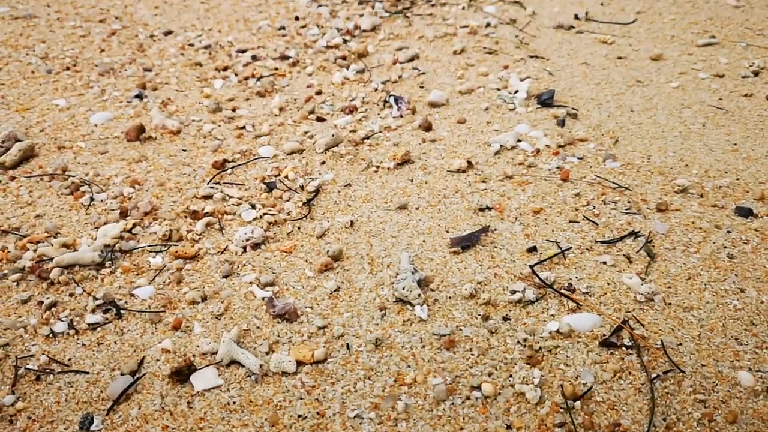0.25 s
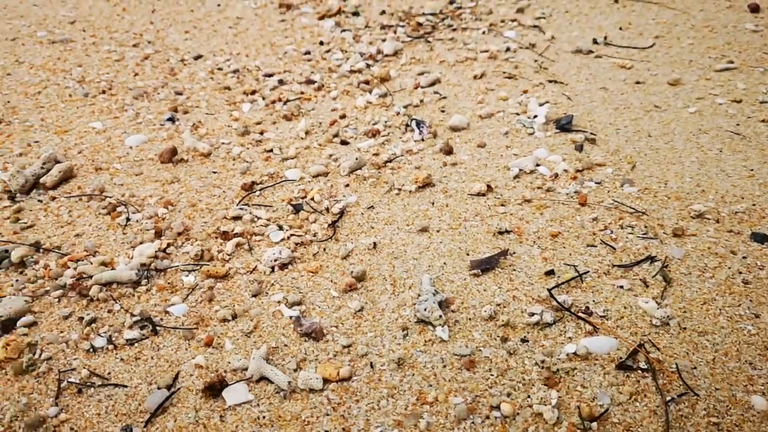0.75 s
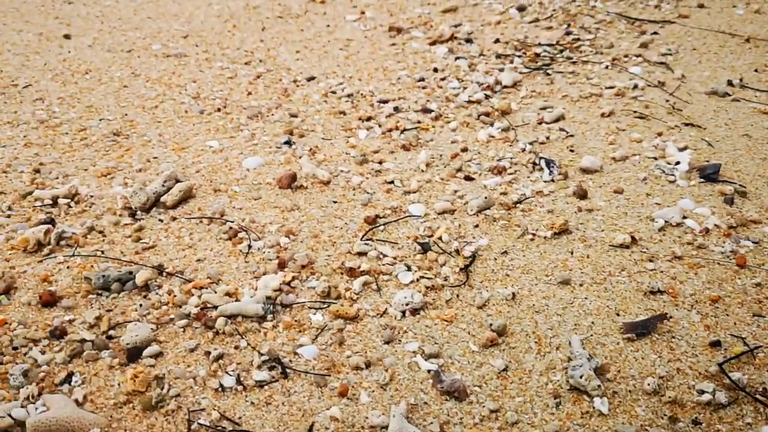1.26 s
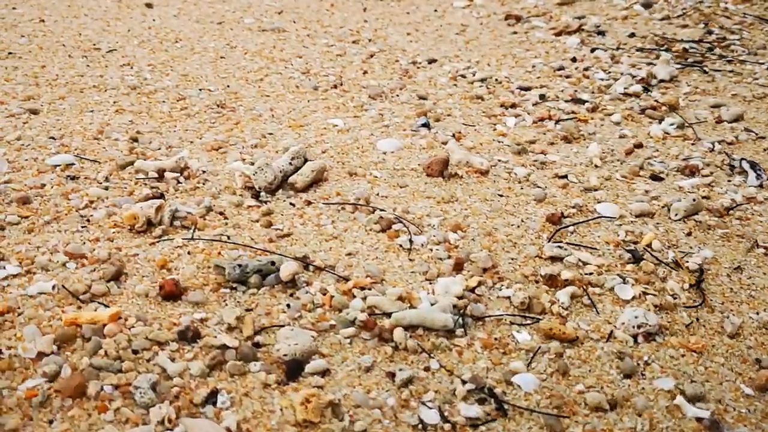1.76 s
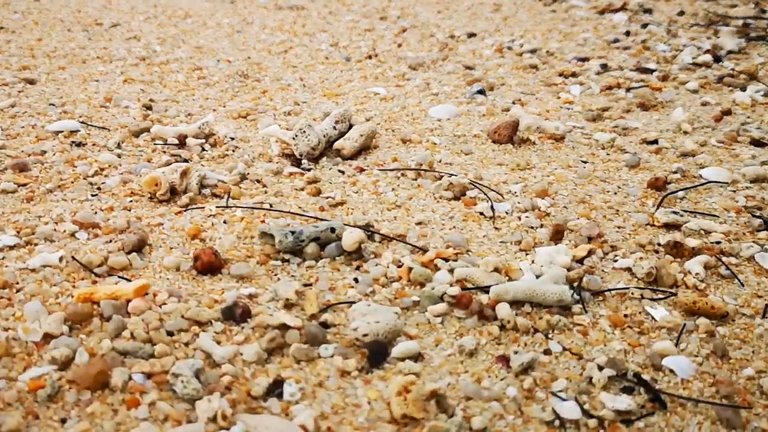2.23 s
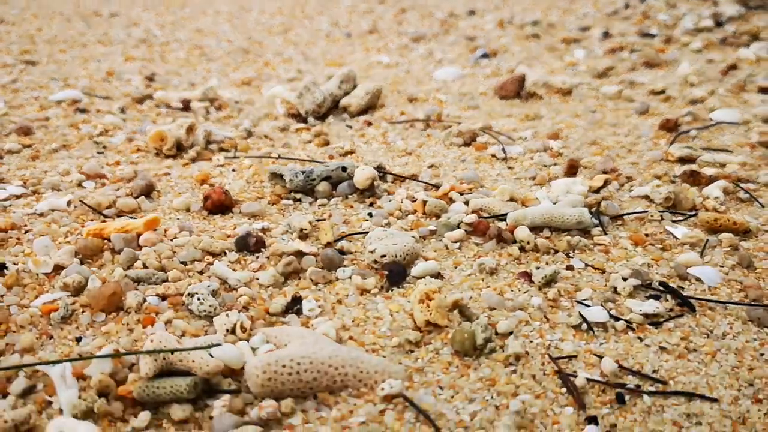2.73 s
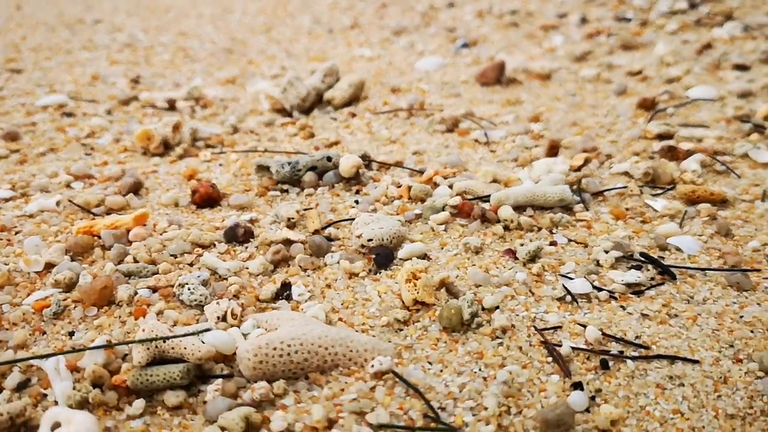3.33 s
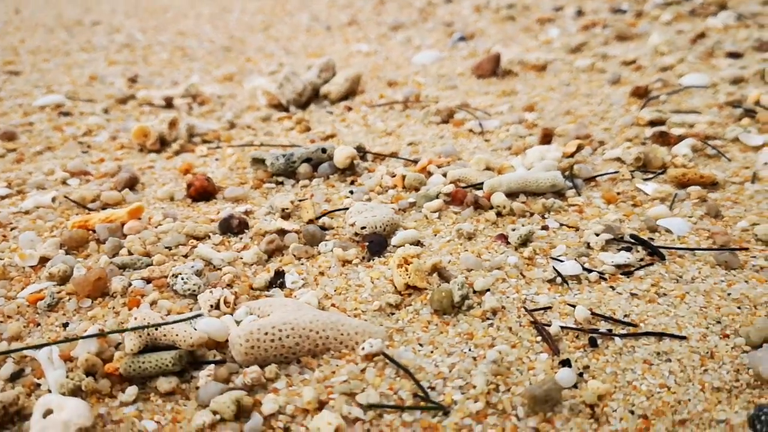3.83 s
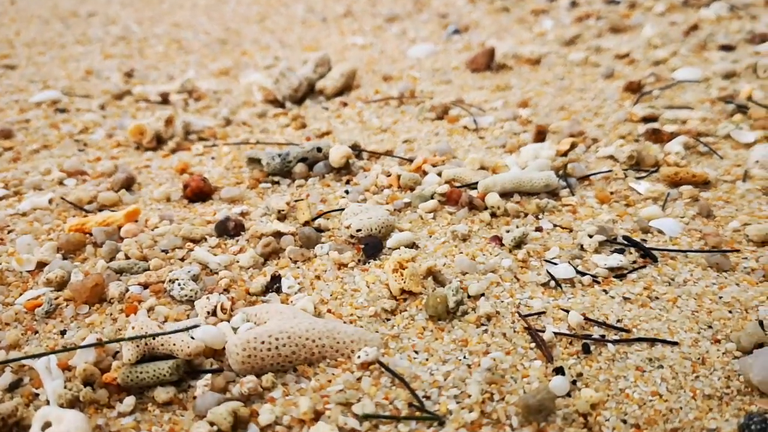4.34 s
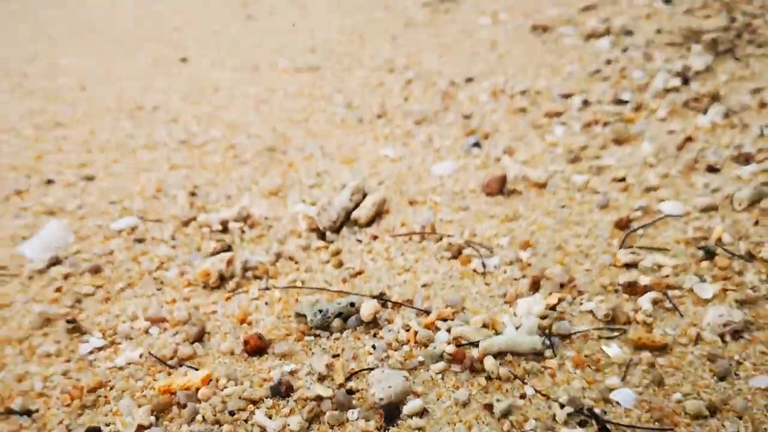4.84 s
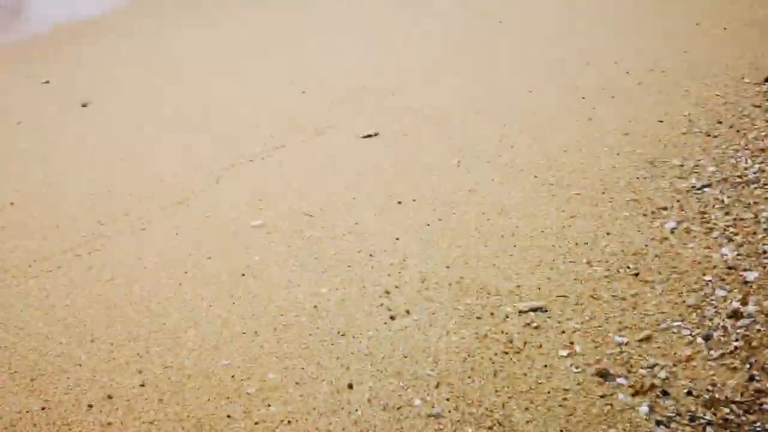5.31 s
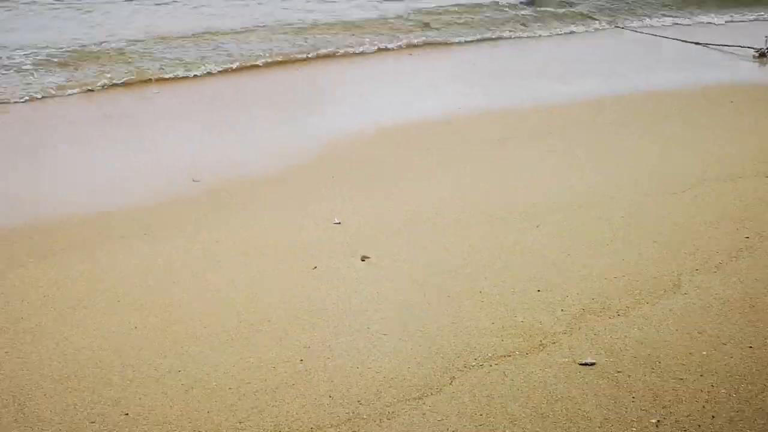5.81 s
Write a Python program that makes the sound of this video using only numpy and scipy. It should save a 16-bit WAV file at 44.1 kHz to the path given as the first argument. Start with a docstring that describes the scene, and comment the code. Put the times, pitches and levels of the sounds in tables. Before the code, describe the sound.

Gentle surf washes and foams over sand while a diesel boat putters steadily, gradually getting a little louder, with an occasional harder crack from the exhaust. The water calms for a moment, then more small waves tumble and hiss in. Scattered raindrops tick near the microphone, two very faint, thin, high whistles pass, and low wind builds into brief buffets toward the end.

```python
"""Longtail boat off a beach

A one-cylinder diesel idles at 14 firings a second, slowly growing louder. Each firing is a low thump
from the open pipe with a short knock, bark and rasp of gas on top. Small waves break and fizz up the
shell sand, wind nudges the microphone, a few raindrops tick close by and two faint whistles arch high."""
import sys
import numpy as np
from scipy import signal
from scipy.fft import rfft, irfft, next_fast_len
from scipy.io import wavfile
from scipy.ndimage import uniform_filter1d

SR = 44100
rng = np.random.default_rng(int(sys.argv[2]) if len(sys.argv) > 2 else 0)


def to_wav(sig):
    """Store sig (one row per channel, or 1-D mono) as 16-bit WAV at the path in sys.argv[1].

    Samples outside -1..1 are clipped; the rate is SR.
    """
    pcm = np.clip(np.atleast_2d(sig), -1, 1) * 32767
    pcm = np.round(pcm).astype(np.int16)
    wavfile.write(sys.argv[1], SR, pcm.T)  # frames by channels


N = 267731
TIME = np.arange(N) / SR
FFT_SIZE = next_fast_len(N, real=True)
FREQ = np.maximum(np.arange(FFT_SIZE // 2 + 1) * SR / FFT_SIZE, 1)
TOP_HZ = 15400

# Gas resonances in the pipe: f/Hz, width/Hz, left/dB, right/dB
KNOCK_MODES = [(746, 610, -4, -7.5), (1263, 180, -14, 3.5), (1920, 110, -7, 0.5)]
BARK_MODES = [(1903, 130, 5, 3), (2323, 550, -16, 6)]
RASP_MODES = [(3550, 360, -2, 2.5), (4150, 640, 0, -0.5), (5050, 550, -9.5, -3.5), (5740, 580, 5.5, 1),
              (7330, 1700, -5.5, -6), (8090, 350, -7, -9.5)]

def engine():
    """Thump, knock, bark and rasp per firing; scattered echoes sustain the pipe's notes in between."""
    times, index, since = firings()
    knock_db, bark_db, rasp_db = gas_levels(times)
    knock = bursts(times + 0.001986, knock_db, KNOCK_MODES,
                   rise_s=0.0031, fall_s=0.0069, tail_db=-36, tail_s=0.017)
    bark = bursts(times + 0.001546, bark_db, BARK_MODES,
                  rise_s=0.0042, fall_s=0.0023, tail_db=-17, tail_s=0.05)
    rasp = bursts(times + 0.00051, rasp_db, RASP_MODES,
                  rise_s=0.0032, fall_s=0.0023, tail_db=-10, tail_s=0.011)
    delay = from_left(lag_s=0.00046)
    direct = shape(thump(times, index, since) + knock + bark + rasp, delay)
    pipe_notes = resonances([(132, 187, 0.6, 0), (249.8, 17.5, 3, 4.5), (476, 103, -24, -20.5)])
    echoes = unit(shape(pair(likeness=0.98), pipe_notes * delay))
    return direct + echoes * undb(curves(EFFORT_DB)[0] - 5.5)


# Engine speed: t/s, firing rate/Hz
FIRING_RATE = [(0.0, 13.799), (0.3, 13.911), (0.7, 14.151), (1.4, 13.999), (2.6, 14.005), (3.2, 13.971),
               (3.8, 14.001), (4.3, 14.139), (4.7, 13.733), (5.4, 14.22), (6.07, 14.398)]

def firings():
    """Firing times; per sample, the index of its firing and the signed time from it."""
    cycles = np.cumsum(curves(FIRING_RATE)[0]) / SR
    times = np.interp(np.arange(int(cycles[-1]) + 1), cycles, TIME)
    index = np.minimum((cycles + 1 / 4).astype(int), len(times) - 1)
    return times, index, TIME - times[index]


# Engine effort as exhaust level: t/s, relative level/dB
EFFORT_DB = [(0, -44), (.45, -42.5), (1, -42), (1.5, -44.5), (2.15, -46), (2.95, -40.5), (3.2, -43),
             (3.7, -38.5), (4.5, -39.5), (4.72, -42.5), (6.07, -43)]

def thump(times, index, since):
    """Each firing booms in the pipe; low notes leave first, higher ones ring on."""
    lead_s, low_hz, high_hz, sweep_s = 0.004, 124, 282, 0.0195
    sway_hz, sway_s, sway_db, boost_db = 78, 0.0085, -12, 12
    swell_jitter, pitch_jitter, jitter_db = rng.standard_normal((len(times), 3))[index].T
    age = np.maximum(since + lead_s, 0)
    sweep = np.minimum(age, sweep_s)
    cycles = low_hz * age + (high_hz - low_hz) * (sweep ** 3 / (3 * sweep_s ** 2) + age - sweep)
    swell = age / (0.0056 * np.exp(0.07 * swell_jitter))
    boom = (swell * np.exp(1 - swell)) ** 0.92 * np.sin(2 * np.pi * cycles * (1 + 0.011 * pitch_jitter))
    # the whole pipe sways once at its lowest note
    sway_age = np.maximum(since / sway_s + 1, 0)
    sway = sway_age * np.exp(1 - sway_age) * np.sin(2 * np.pi * sway_hz * sway_s * sway_age)
    return (boom + undb(sway_db) * sway) * undb(curves(EFFORT_DB)[0] + boost_db + jitter_db)


# Firings that crack harder: t/s, extra knock/dB, extra bark/dB, extra rasp/dB
HARD_CRACKS = [(.43, 5, 9, 6), (.79, -1, -9, 13), (1.43, 7.5, 3, 0), (1.64, 8, 6, 1), (2.0, 8.5, -6, 0),
               (2.43, -7, 7, 5), (2.78, -1, 1.5, 9), (3.21, 3, 3.5, 0), (3.36, -7, 5.5, 2),
               (3.43, -6, 2.5, 5), (3.71, -7, 5, 4), (4.07, 8.5, 4, 0.5), (4.14, 7, 6.5, 4),
               (4.21, 2, 9, 3.5), (4.36, -19, 4, 0.5), (4.64, 6.5, 7.5, 2.5), (5.0, -6, 9, 7),
               (5.07, 0, 7, 3.5), (5.29, 2, 4.5, 3.5), (5.43, 0, 6, 0.5), (5.92, 0, 9.5, 5.5)]

def gas_levels(times):
    """Knock, bark and rasp in dB per firing: the gas follows the effort and grows as the boat nears."""
    idle_db, scatter_db = -41.5, 0.9
    effort_db = curves(EFFORT_DB, times)[0] - idle_db
    burn_db = scatter_db * rng.standard_normal(len(times))
    knock_db = -62.5 + 0.1 * effort_db + 1.65 * times
    bark_db = -56.5 + 1.36 * effort_db + 1.18 * times
    rasp_db = -58 + 0.041 * effort_db + 1.55 * times
    levels_db = np.array([knock_db, bark_db, rasp_db]) + burn_db
    for t, *extra_db in HARD_CRACKS:
        nearest = np.argmin(abs(times - t))
        levels_db[:, nearest] += np.array(extra_db) - burn_db[nearest]
    return levels_db


def bursts(times, levels_db, modes, rise_s, fall_s, tail_db, tail_s):
    """Gas at each firing: the valve opens, the pressure drops, a faint tail follows."""
    size, lead, detune, scatter_db = 4096, 512, 0.035, 3.2
    since = (np.arange(size) - lead) / SR
    after = np.maximum(since, 0)
    bins_hz = np.maximum(np.arange(size // 2 + 1) * SR / size, 1)
    opening = np.exp(-(np.minimum(since, 0) / rise_s) ** 2)
    decay = np.exp(-after / fall_s) + undb(tail_db) * np.exp(-after / tail_s)
    out = np.zeros((2, N + 2 * size))
    for t, db in zip(times, levels_db):
        # no two firings burn alike: resonances shift and trade strength
        jitter = rng.standard_normal((len(modes), 2)) * [detune, scatter_db]
        varied = [(hz * (1 + shift), width, left + gain_db, right + gain_db)
                  for (hz, width, left, right), (shift, gain_db) in zip(modes, jitter)]
        gas = irfft(rfft(pair(likeness=0.83, size=size)) * resonances(varied, bins_hz))
        start = max(int(t * SR), 0)
        out[:, start:start + size] += unit(gas * opening * decay) * undb(db)
    return out[:, lead:lead + N]


# Water spectra: f/Hz, left/dB, right/dB
TUMBLE_SPECTRUM = [(150, -35, -35), (310, -2, 4.5), (553, -2, -2.5), (865, 1, 0), (1033, 3, 5.5),
                   (1470, -12.5, -4), (2270, -41, -58)]
WASH_SPECTRUM = [(835, -8, -8), (1360, 2.5, 2), (1810, 6, 4), (2430, -0.5, 2), (2580, 3.5, 0.5),
                 (3380, -11, -10.5), (4700, -39, -30)]
FOAM_SPECTRUM = [(1800, -8.5, -18.5), (3530, 4.5, -1.5), (4600, 3.5, 0), (5830, 1.5, 0), (7400, 2, -1.5),
                 (8200, 1.5, -4), (9320, 0, -1.5), (10030, -36, -10), (11500, -34, -19), (13000, -42, -51)]
SPRAY_SPECTRUM = [(8000, -21, -14), (10300, -3, -3), (12700, -0.5, 5.5), (14000, 3, 7), (14900, -1, -18)]
# Hollow ring of the wash: t/s, f/Hz
RING_HZ = [(0, 2133), (1.6, 2128), (4.1, 2642), (4.8, 1864), (6.07, 1978)]
# Waves: crest/s, base rise/s, hold/s, base fall/s,
# tumble/dB, wash/dB, ring/dB, foam/dB, spray/dB, tumble pan/dB, foam pan/dB
SURF = [(0, 0.28, 0.22, 0.39, -53.5, -44.5, -52.5, -50, -83, 10, -22),
        (.4, 0.34, .25, 0.28, -50, -41.5, -47, -37, -54.5, 10.5, -1.5),
        (.73, .07, 0.056, 0.072, -42.5, -42, -47.5, -38, -51.5, 4.5, -11),
        (.87, 0.076, 0.061, 0.32, -43, -42, -47, -41.5, -59.5, 4.5, -13),
        (.964, 0.0067, 0.0059, 0.0097, -41, -37, -50, -33.5, -54, 6, -8),
        (1.66, 0.32, .15, 0.4, -63, -55, -57, -52, -65, 5, -4.5),
        (3.7, 0.7, 0.73, 0.55, -43, -50, -80, -57, -82, -0.1, -5),
        (4.17, 0.25, 0.55, 0.33, -71, -53, -48.5, -52.5, -76, 2.5, -7),
        (4.73, 0.21, 0.25, .13, -49.5, -41, -38.5, -38, -54, 9, 0),
        (5.33, 0.64, .15, 0.81, -55.5, -41, -47, -45.5, -62, 14.5, -4.5),
        (5.78, 0.14, 0.43, .25, -49, -42, -55, -42.5, -62, -3, -7)]

def sea():
    """Waves tumble, wash up the sand with a hollow ring, then fizz out as foam."""
    *_, tumble_db, wash_db, ring_db, foam_db, spray_db, tumble_pan_db, foam_pan_db = np.transpose(SURF)
    wash_pan_db = np.full(len(SURF), -4)
    # the ring wavers as the water churns
    ring_hz = curves(RING_HZ)[0] * (1 + 0.035 * walk(rate_hz=25))
    ring = band(ring_hz, width_hz=180, likeness=0.37) * pan(db=-2.5) * undb(2.1 * walk(rate_hz=40))
    wash = bubbles(WASH_SPECTRUM, likeness=0.088, grain_db=3, lag_s=0.00047)
    tumble = bubbles(TUMBLE_SPECTRUM, likeness=0.44, grain_db=3.5, lag_s=0.00031)
    foam = bubbles(FOAM_SPECTRUM, likeness=0.09, grain_db=3, lag_s=0.000417)
    spray = bubbles(SPRAY_SPECTRUM, likeness=0.068, grain_db=3, lag_s=0.000397) * pan(db=6)
    return (tumble * surge(tumble_db, tumble_pan_db, rise_scale=1.33, fall_scale=0.46, calm_db=-75.5)
            + wash * surge(wash_db, wash_pan_db, rise_scale=1.3, fall_scale=0.53, calm_db=-67)
            + ring * surge(ring_db, wash_pan_db, rise_scale=0.92, fall_scale=0.6, calm_db=-82.5)
            + foam * surge(foam_db, foam_pan_db, rise_scale=0.83, fall_scale=1.16, calm_db=-60.5)
            + spray * surge(spray_db, foam_pan_db, rise_scale=0.63, fall_scale=0.92, calm_db=-77))


def surge(levels_db, pans_db, rise_scale, fall_scale, calm_db):
    """Stereo gain of one surf layer: each wave builds, holds and drains over a calm floor."""
    power = undb(calm_db) ** 2
    for (crest, rise, hold, fall, *_), db, pan_db in zip(SURF, levels_db, pans_db):
        before = np.maximum(crest - TIME, 0) / (rise * rise_scale)
        after = np.maximum(TIME - crest - hold, 0) / (fall * fall_scale)
        power = power + (undb(db) * pan(pan_db) * np.exp(-before - after)) ** 2
    return np.sqrt(power)


def bubbles(spectrum, likeness, grain_db, lag_s):
    """Countless bubbles as grainy noise; each octave flickers on its own by about 1 dB."""
    fizz = rfft(pair(likeness, grain_db), FFT_SIZE) * colour(spectrum) * from_left(lag_s)
    octave = np.log2(FREQ / TOP_HZ) + 7
    bands = (irfft(fizz * np.maximum(1 - abs(octave - k), 0), FFT_SIZE)[:, :N] for k in range(8))
    return unit(sum(part * undb(walk(rate_hz=28)) for part in bands))


# Hollow hiss in the surf: t/s, half-width/s, f/Hz, glide/(Hz/s), bandwidth/Hz, level/dB
HISS_BANDS = [(0.56, 0.27, 9400, 101.5, 550, -46), (.74, 0.31, 7350, 699.5, 470, -46),
              (.58, 0.35, 4650, 200.5, 450, -49.5), (5.7, 0.31, 9250, -500, 570, -51),
              (5.98, 0.47, 7850, -700, 430, -49), (5.83, 0.18, 10500, 6, 710, -54.5)]

def sizzle():
    """Narrow, hollow bands of hiss in the surf swell, glide and fade, mostly on the right."""
    out = 0
    for t, half_s, hz, glide, width_hz, db in HISS_BANDS:
        centre_hz = hz + glide * np.clip(TIME - t, -1, 1)
        out = out + band(centre_hz, width_hz, likeness=0.24) * undb(db) * bump(t, half_s)
    return out * pan(db=-16)


# Wind spectrum: f/Hz, left/dB, right/dB
WIND_SPECTRUM = [(8, -8, -10), (26, 2.5, 2), (40.8, -11.5, -8.5), (60, -2, -3.5), (115, -11, -10.5),
                 (173, -19, -16), (297, -35.5, -34.5), (660, -88, -71.5)]
# Gusts: t/s, half-width/s, level/dB
WIND_GUSTS = [(0.608, 0.78, -46), (1.183, 0.069, -39), (4.3, 0.54, -40.5), (5.108, 0.061, -32.5),
              (5.452, 0.12, -26), (5.75, 0.46, -38)]
# Single buffets: t/s, half-width/s, peak pressure/full scale
WIND_BUFFETS = [(5.145, 0.007, -0.093), (5.17, 0.0071, 0.053), (5.401, 0.0043, -0.081),
                (5.453, 0.0029, 0.18)]

def wind():
    """Wind on the microphone: a low rumble that swells in gusts, with a few single buffets."""
    breeze_db = -41
    power = undb(breeze_db) ** 2 + sum(undb(db) ** 2 * bump(t, half_s) for t, half_s, db in WIND_GUSTS)
    rumble = unit(shape(pair(likeness=0.99), colour(WIND_SPECTRUM))) * np.sqrt(power)
    return rumble + sum(peak * bump(t, half_s) for t, half_s, peak in WIND_BUFFETS)


# Close drops: t/s, relative level/dB, f/Hz
RAINDROPS = [(0.757, -28, 7100), (2.147, -53, 8850), (2.61, -46, 5060), (4.461, -35, 3600),
             (4.612, -45, 7000), (5.203, -35, 5700), (5.351, -31.5, 5000)]

def rain():
    """Single drops tick on shells and on the microphone."""
    out, decay_s = 0, 0.003
    for t, db, hz in RAINDROPS:
        tick = unit(shape(pair(likeness=0.3), resonances([(hz, 0.72 * hz, 0, 0)])))
        envelope = (TIME >= t) * np.exp(-abs(TIME - t) / decay_s)
        out = out + undb(db + 1.5) * envelope * tick
    return out


# Treble whistles: t/s, half-width/s, top f/Hz, level/dB
WHISTLE_ARCHES = [(0.98, .055, 14250, -55), (4.572, .035, 14270, -62)]

def whistles():
    """Faint, thin tones that rise and fall in pitch and level."""
    out = 0
    for t, half_s, top_hz, db in WHISTLE_ARCHES:
        arch = bump(t, half_s)
        hz = top_hz * (1 - 0.045 * (1 - arch) + 0.004 * walk(rate_hz=400))
        out = out + undb(db) * arch * np.sqrt(2) * np.sin(2 * np.pi * np.cumsum(hz) / SR)
    return out


def undb(db):
    """Decibels to gain."""
    return 10 ** (np.asarray(db) / 20)


def unit(x):
    """Scale to rms 1."""
    return x / np.sqrt(np.mean(x ** 2))


def bump(t, half_s):
    """Gaussian: 1 at t, 1/e at half_s either side."""
    return np.exp(-((TIME - t) / half_s) ** 2)


def curves(table, at=TIME):
    """Table columns interpolated over time."""
    times, *columns = np.transpose(table)
    return [np.interp(at, times, column) for column in columns]


def shape(x, gain):
    """Filter by a gain per frequency."""
    return irfft(rfft(x, FFT_SIZE) * gain, FFT_SIZE)[..., :N]


def colour(spectrum):
    """Stereo gain of a spectrum, interpolated over log frequency."""
    hz, *sides = np.transpose(spectrum)
    return undb([np.interp(np.log(FREQ), np.log(hz), db) for db in sides])


def resonances(modes, at=FREQ):
    """Stereo gain of steep-sided resonances."""
    return sum(undb([[left], [right]]) / (1 + ((at / hz - hz / at) * hz / width) ** 2)
               for hz, width, left, right in modes)


def pan(db):
    """Stereo gain for a level difference, left minus right."""
    return undb(db * np.array([[1], [-1]]) / 2)


def from_left(lag_s):
    """Sound from the left reaches the right microphone later."""
    return np.exp(-2j * np.pi * FREQ * np.array([[0], [lag_s]]))


def walk(rate_hz):
    """Random steps, smoothed twice; spread near 1."""
    hold = int(SR / rate_hz)
    steps = np.repeat(rng.standard_normal(N // hold + 1), hold)
    return 1.3 * uniform_filter1d(uniform_filter1d(steps, hold), hold)[:N]


def pair(likeness, grain_db=0, size=N):
    """Partly correlated stereo noise; grain_db makes single bubbles stand out."""
    noise = rng.standard_normal((3, size))
    noise *= undb(grain_db * np.minimum(rng.exponential(size=(3, size)), 8))
    return unit(np.sqrt(likeness) * noise[2] + np.sqrt(1 - likeness) * noise[:2])


def band(hz, width_hz, likeness):
    """Narrow noise around a moving centre."""
    narrow = shape(pair(likeness), 1 / (1 + (FREQ / width_hz) ** 2))
    return unit(narrow * np.cos(2 * np.pi * np.cumsum(hz) / SR))


def scene():
    """Boat, surf, wind, drops and whistles."""
    return engine() + sea() + sizzle() + wind() + rain() + whistles()


def record(dry):
    """Steep low-pass at TOP_HZ."""
    return signal.sosfilt(signal.ellip(10, 0.2, 80, TOP_HZ, fs=SR, output="sos"), dry)


dry = scene()
out = record(dry)
to_wav(out)
```